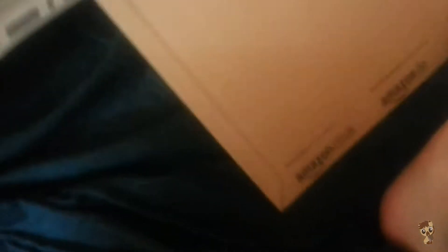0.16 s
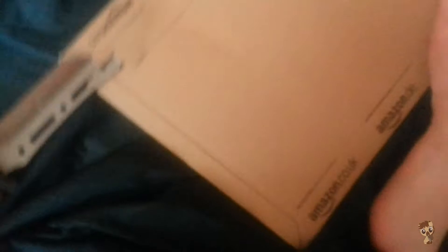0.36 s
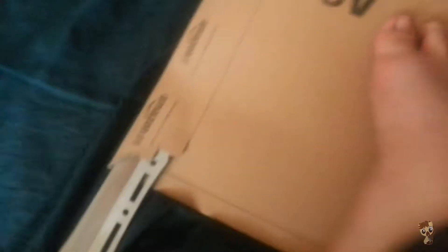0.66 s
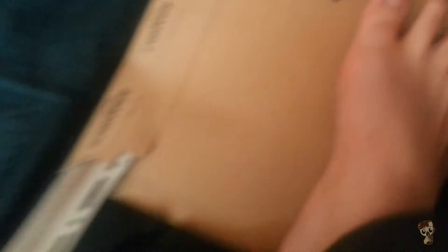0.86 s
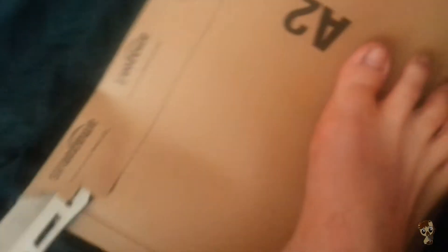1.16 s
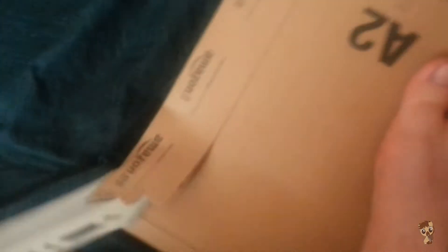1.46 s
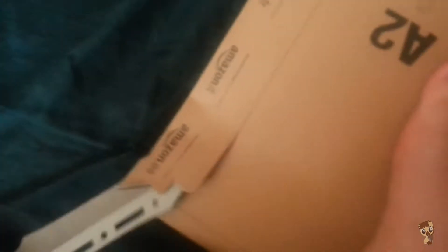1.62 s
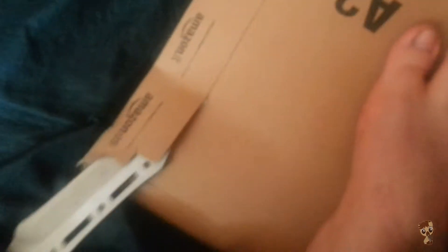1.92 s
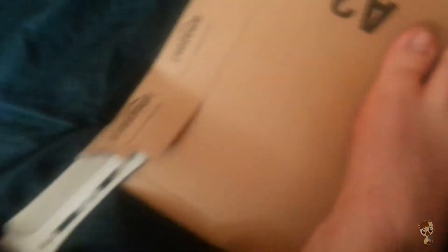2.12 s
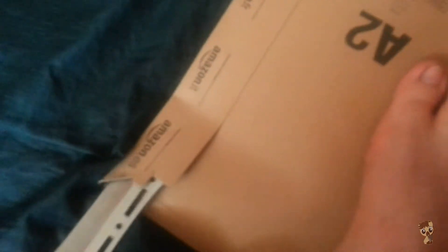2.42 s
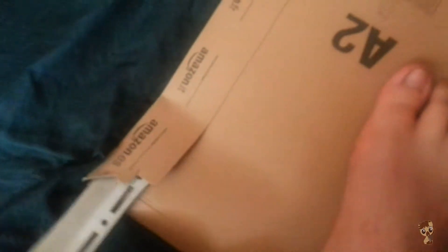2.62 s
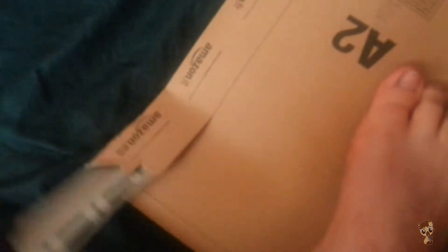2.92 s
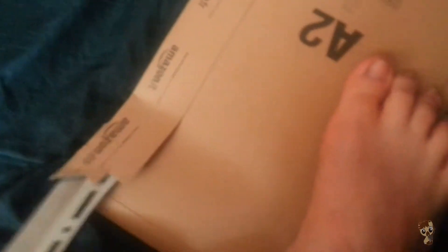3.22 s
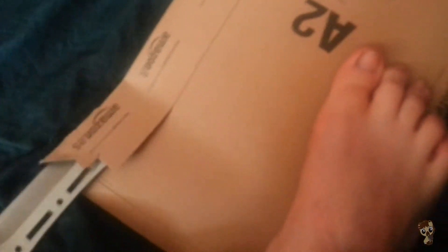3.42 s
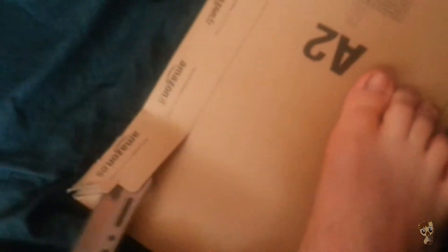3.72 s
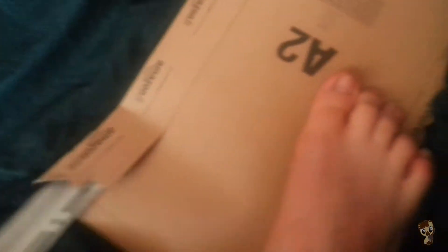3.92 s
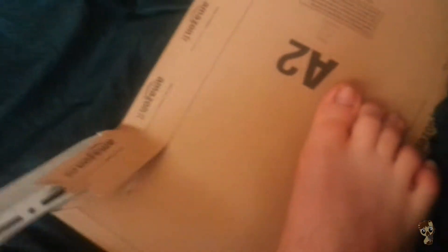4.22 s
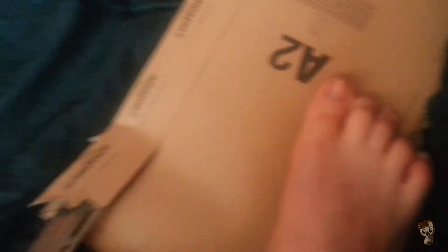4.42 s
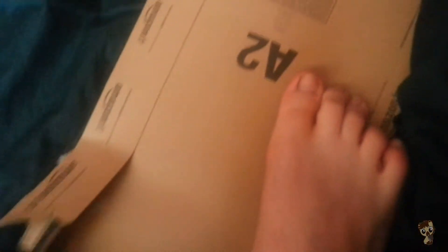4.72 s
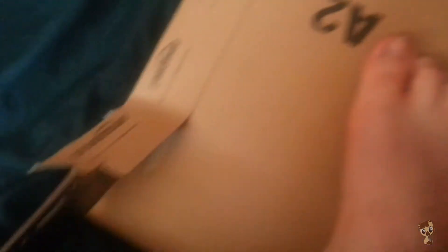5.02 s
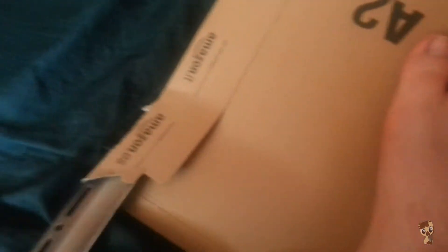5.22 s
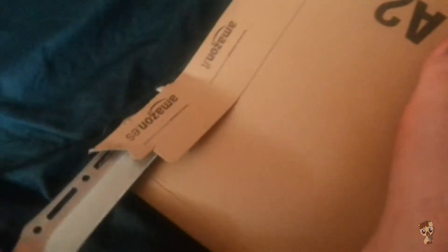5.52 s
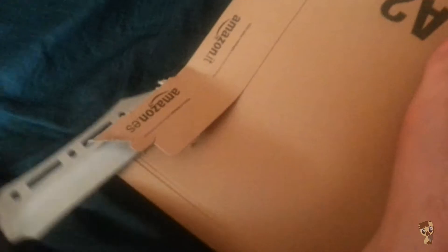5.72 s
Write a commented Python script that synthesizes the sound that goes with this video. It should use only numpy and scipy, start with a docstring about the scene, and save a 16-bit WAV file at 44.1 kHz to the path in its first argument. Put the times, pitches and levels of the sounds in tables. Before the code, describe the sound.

Close, dry cardboard rasping and tearing in short jerky bursts, with small crisp snaps, dull panel pops and faint hiss.

```python
"""Bedroom: a steel blade saws back and forth under the glued flap of a cardboard mailer lying on a bed, close by.
Random fibre breaks, shaped by the strokes and two flap modes, make the rasp; short pitched bursts make the snaps.
The flat panel drums as low filtered breaks; its pops, and handling knocks, are decaying modes that sag in pitch.
Two microphone ports ring at different pitches; shaped noise gives a faint hiss and a thin high whine."""
import sys
import numpy as np
from scipy import signal
from scipy.fft import rfft, irfft, next_fast_len
from scipy.io import wavfile
from scipy.ndimage import uniform_filter1d, map_coordinates

SR = 44100
rng = np.random.default_rng(int(sys.argv[2]) if len(sys.argv) > 2 else 0)


def magnitude_from_level(level_db):
    """Linear magnitude for a level in decibels (20 dB per decade)."""
    exponent = np.asarray(level_db, float) / 20
    return 10 ** exponent


def wav_record(signal):
    """Record a signal, one row per channel, as 16-bit PCM in the file named by sys.argv[1]."""
    frames = np.transpose(np.atleast_2d(signal))
    bounded = np.clip(frames, -1, 1)
    # unit amplitude maps onto the largest positive 16-bit level
    quanta = np.round(bounded * 32767).astype(np.int16)
    wavfile.write(sys.argv[1], SR, quanta)


N = 258426

# how the flap is held: time_s, brightness_db_per_octave, left_turn_db, drum_over_rasp_db
FLAP_GRIP = [(0, 0, -3, -12), (0.45, -2.5, -3, -15), (0.8, 0, -3.5, -10.5), (1.1, -2, -0.5, -11),
             (1.45, -0.5, -1.5, -8), (1.75, 0, -5, -12), (2.1, -1.5, -1, -13), (2.45, -2, -3.5, -11),
             (2.8, -2.5, -0.5, -10.5), (3.05, -1, -3.5, -12.5), (3.4, -3.5, -1.5, -14),
             (3.75, -3.5, -1, -12.5), (4.1, -1.5, -3.5, -12.5), (4.4, 1.5, -2, -14), (4.7, -5.5, -1.5, -17),
             (4.9, 2.5, -1.5, -4), (5.1, -2.5, 3, -14.5), (5.4, -1.5, 0, -12), (5.86, 0.5, 0.5, -14)]


def unit(x):
    """Scaled to rms 1."""
    return x / np.sqrt(np.mean(x ** 2) + 1e-20)


def along(points, hz):
    """(Hz, value) points read on a log frequency axis."""
    f, v = np.transpose(points)
    return np.interp(np.log(hz + 1), np.log(f + 1), v)


def over_time(rows, column, t):
    """One column of a table of curves at times t."""
    rows = np.transpose(rows)
    return np.interp(t, rows[0], rows[column])


def coloured(x, spectrum):
    """x through the causal minimum-phase filter of this (Hz, dB) shape, built by folding the cepstrum."""
    m = 2 * next_fast_len(N // 2 + 4096)
    gain = magnitude_from_level(along(spectrum, np.fft.rfftfreq(m, 1 / SR)))
    cepstrum = irfft(np.log(gain + 1e-6), m)
    cepstrum[1:m // 2] *= 2
    cepstrum[m // 2 + 1:] = 0
    return irfft(rfft(x, m) * np.exp(rfft(cepstrum)), m)[..., :N]


def wobble(rate_hz):
    """A smooth random curve, rate_hz knots a second."""
    knots = rng.standard_normal(N // 50)
    return map_coordinates(knots, [np.arange(N) * rate_hz / SR])


def strokes(t):
    """Level (dB) and mode balance (dB) at times t: stroke powers add and weight the balance."""
    # blade strokes: hardest_push_s, level_db, rise_s, fall_s, high_over_low_mode_db; rise and fall span 20 dB
    stroke_rows = [(0.019, -25, 0.33, 0.12, 1), (0.108, -27, 0.1, 0.056, 3.5),
                   (0.185, -28.5, 0.029, 0.032, -7), (0.368, -32.5, 0.16, 0.32, 1.5),
                   (0.594, -30, 0.28, 0.13, 0), (0.734, -37.5, 0.11, 0.14, -4),
                   (0.915, -34, 0.074, 0.58, 2.5), (1.122, -31.5, 0.16, 0.06, -1),
                   (1.271, -35.5, 0.051, 0.15, -3), (1.473, -19.5, 0.038, 0.071, -9),
                   (1.534, -21.5, 0.052, 0.042, 3), (1.628, -26.5, 0.08, 0.034, -4),
                   (1.683, -28, 0.049, 0.093, -4), (1.755, -27.5, 0.12, 0.064, -4),
                   (1.877, -30.5, 0.033, 0.018, -8), (1.933, -33.5, 0.07, 0.065, -3.5),
                   (2.038, -18.5, 0.037, 0.037, 1), (2.085, -27.5, 0.057, 0.035, 0),
                   (2.171, -19, 0.042, 0.075, -1.0), (2.336, -26, 0.081, 0.05, -1),
                   (2.437, -22, 0.051, 0.077, -3), (2.608, -29.5, 0.061, 0.034, -7.5),
                   (2.719, -33, 0.076, 0.18, -15), (2.806, -20.5, 0.17, 0.14, -11),
                   (2.954, -33, 0.041, 0.062, -3), (3.041, -28, 0.046, 0.086, 1),
                   (3.157, -44, 0.053, 0.43, -7), (3.272, -20, 0.04, 0.017, -8),
                   (3.326, -26.5, 0.081, 0.054, -2.5), (3.416, -23.5, 0.036, 0.1, -8),
                   (3.458, -23.5, 0.076, 0.024, -4), (3.5, -39.5, 0.06, 0.085, -1),
                   (3.687, -39, 0.033, 0.042, -1.0), (3.758, -27.5, 0.064, 0.073, -10),
                   (3.856, -39, 0.068, 0.12, -11), (3.998, -35.5, 0.19, 0.12, 0),
                   (4.081, -22.5, 0.064, 0.088, -10.5), (4.128, -23.5, 0.093, 0.062, -6.5),
                   (4.214, -38, 0.11, 0.08, -4), (4.366, -36.5, 0.084, 0.11, -1),
                   (4.425, -33.5, 0.12, 0.05, -11), (4.541, -38.5, 0.086, 0.083, -6),
                   (4.721, -25, 0.024, 0.14, -8.5), (4.789, -25, 0.099, 0.051, -11),
                   (4.897, -43, 0.068, 0.11, -4), (4.979, -28, 0.015, 0.081, 2),
                   (5.037, -17.5, 0.056, 0.071, 7.5), (5.131, -19, 0.061, 0.069, 0),
                   (5.283, -35.5, 0.43, 0.12, 1.5), (5.352, -25, 0.014, 0.1, 3),
                   (5.416, -24, 0.055, 0.019, 9), (5.445, -36, 0.04, 0.055, 1), (5.69, -34, 0.027, 0.11, 1),
                   (5.775, -32, 0.12, 0.061, 7.5), (5.861, -34, 0.049, 0.07, -4)]
    roundness = 1.53  # 1 = pointed stroke, 2 = bell
    rest_db = -60  # blade lying still
    peak_s, level_db, rise_s, fall_s, mode_db = np.transpose(stroke_rows)[:, :, None]
    span_s = np.maximum(np.where(t < peak_s, rise_s, fall_s), .008)
    late = (t - peak_s) / span_s
    power = magnitude_from_level(level_db - 20 * np.abs(late) ** roundness) ** 2
    total = power.sum(0) + magnitude_from_level(rest_db) ** 2
    return 10 * np.log10(total), (power * mode_db).sum(0) / total


def stroke():
    """Push of the blade in dB, read every 2 ms and interpolated to one value per sample."""
    t = np.arange(0, N / SR + .002, .002)
    return np.interp(np.arange(N) / SR, t, strokes(t)[0])


def fibres(share, spread_db, clump_db, clump_rate_hz):
    """Tiny breaks: a share of all samples fires, a few much harder, in clumps."""
    fire, size, sign = rng.random(N), rng.exponential(size=N), rng.standard_normal(N)
    strength = magnitude_from_level(spread_db * size + clump_db * wobble(clump_rate_hz))
    return unit((fire < share) * sign * strength)


def contact(x, width_oct, patchy_db):
    """The flap rings in a low and a high mode; each stroke has its balance, the grip sets brightness and side."""
    # how sharply both modes ring out of the rasp: time_s, ringing_db
    mode_ringing = [(0, -1.5), (1.1, 1.5), (1.5, 1.5), (2.04, 2), (2.8, 0), (3.3, 0.5), (4.1, -0.5),
                    (4.75, 0), (5.08, 5.5), (5.4, 2), (5.86, 3)]
    dulls = 0.1  # dB per octave of brightness lost per dB of push
    # the steel blade rings near 12 kHz once
    blade_s, blade_half_s, blade_db, blade_hz = 5.09, 0.067, 10.5, 12400
    hz, t, z = signal.stft(x, SR, nperseg=256)
    hz = hz[:, None]
    octave = np.log2((hz + 50) / 4000)
    high = np.exp(-((octave - .33) / width_oct * 1.5) ** 2)
    low = np.exp(-((octave + .35) / width_oct) ** 2)
    narrow = np.exp(-((octave - .36) / 0.075) ** 2) + np.exp(-((octave + 0.58) / 0.39) ** 2)
    narrow -= np.exp(-(octave / 0.062) ** 2)  # dip between the modes

    # random patches of time and frequency make the rasp uneven, more so in hard strokes
    field = rng.standard_normal(z.shape[1:])
    field = uniform_filter1d(uniform_filter1d(field, size=3, axis=0), size=10, axis=1)
    level_db, mode_db = strokes(t)
    patches = patchy_db * np.clip(1.5 + (level_db + 24) / 25, .3, 1.3) * unit(field)

    bright = over_time(FLAP_GRIP, 1, t) - dulls * (level_db + 27.0)
    tilt = bright * np.maximum(octave - .4, 0)
    blade_ring = blade_db * np.exp(-((t - blade_s) / blade_half_s) ** 4 - ((hz - blade_hz) / 1500) ** 2)
    ringing = over_time(mode_ringing, 1, t) * narrow
    gain = magnitude_from_level(mode_db / 2 * (high - low) + ringing + tilt + blade_ring + patches)
    gain /= np.sqrt(np.mean(gain[14:36] ** 2, axis=0))  # rms gain 1 over 2.4-6 kHz
    right = magnitude_from_level(-over_time(FLAP_GRIP, 2, t))
    sides = np.array([np.ones_like(right), right])[:, None]
    return signal.istft(z * gain * sides, SR, nperseg=256)[1][..., :N]


def rasp():
    """One stream of breaks reaches both ports, each port hears some of its own; hard strokes tear in jerks."""
    both, left, right = [fibres(.5, spread_db=1.5, clump_db=1.5, clump_rate_hz=440) for _ in range(3)]
    own = .7  # power share heard by one port alone
    pair = np.sqrt(1 - own) * both + np.sqrt(own) * np.array([left, right])
    level = magnitude_from_level(stroke())
    depth_db = 2.4 * np.clip(level / .08, .15, 1)
    jerks = magnitude_from_level(depth_db * (wobble(260) + .6 * wobble(60)))
    return magnitude_from_level(11.5) * level * jerks * contact(pair, width_oct=0.74, patchy_db=1.5)


def slips():
    """The blade snaps free: each snap is a millisecond burst of noise and tone that rings at its own pitch."""
    # snaps of single fibres and glue spots: start_s, relative_level_db, pitch_hz
    snap_rows = [(1.4541, -23, 3900), (1.463, -8.5, 4900), (1.475, -8, 3600), (1.488, -13.5, 4450),
                 (1.516, -6, 5200), (1.531, -20, 3960), (1.542, -7.5, 4160), (1.6827, -4.5, 7400),
                 (1.8295, -18, 4700), (1.877, -31, 3880), (2.0223, -16, 4660), (2.0401, -3, 4920),
                 (2.611, -19, 4070), (2.7494, -14, 2850), (2.867, -7, 2600), (2.942, -14.5, 3380),
                 (3.025, -19, 4820), (3.0517, -12, 5000), (3.262, -8.5, 4760), (3.276, -2.5, 4880),
                 (3.3915, -16.5, 3950), (3.686, -21, 4630), (3.896, -23, 4250), (3.995, -10.5, 6800),
                 (4.0738, -5.5, 3380), (4.132, -10, 3680), (4.356, -16, 3240), (4.403, -15.5, 3530),
                 (4.801, -9.5, 2720), (4.9307, -27, 4280), (5.029, -6.5, 5130), (5.045, -8, 5200),
                 (5.093, -8.5, 3140), (5.125, -4, 3200), (5.141, -5, 4700), (5.155, -10.5, 3800),
                 (5.171, -10.5, 4730), (5.267, -26, 4540), (5.3248, -21, 4240), (5.3475, -12, 5000),
                 (5.5954, -25.5, 2360), (5.687, -20.5, 4100)]
    out, t = np.zeros((2, N + 2048)), np.arange(2048) / SR
    hz = np.fft.rfftfreq(len(t), 1 / SR)
    shape = (1 - np.exp(-t / 0.00015)) * np.exp(-(t / 0.0022) ** 2)
    width_hz = 800
    for start_s, level_db, pitch_hz in snap_rows:
        noise = rng.standard_normal((3, len(t)))
        tone = 0.68 * np.sin(2 * np.pi * pitch_hz * t)
        burst = shape * (noise[0] + noise[1:] + tone)  # shared noise plus one per port
        burst /= np.linalg.norm(burst)
        ring = 0.58 + 1.6j * hz * width_hz / (pitch_hz ** 2 - hz ** 2 + 1j * hz * width_hz)
        out[:, round(start_s * SR):][:, :len(t)] += magnitude_from_level(20 + level_db) * irfft(rfft(burst) * ring)
    return out[:, :N]


def drumming():
    """The sheet drums under the stroke: low filtered breaks that lag behind the push in level."""
    # drum spectrum: freq_hz, relative_level_db
    drum_spectrum = [(25, -39), (70, -14), (110, -4), (170, 0), (210, -0.5), (238, 5), (285, -2.5),
                     (450, -4.5), (900, -8), (1800, -10.5), (2600, -8), (4400, -58)]
    drum_lag = 0.16  # dB of drumming left behind per dB of push
    both, left, right = [fibres(.3, spread_db=2, clump_db=1.5, clump_rate_hz=60) for _ in range(3)]
    apart = coloured(np.array([left, right]), [(40, 20.5), (200, -12.5), (600, 0.5), (1500, 2.5)])
    side_db = np.array([[4.2], [1.8]])
    t = np.arange(N) / SR
    drum_db = over_time(FLAP_GRIP, 3, t) - drum_lag * (stroke() + 30) + side_db
    return magnitude_from_level(stroke() + drum_db) * unit(coloured(both + apart, drum_spectrum))


def smooth_noise(count, size):
    """Noise dulled by two running means of size samples."""
    return uniform_filter1d(uniform_filter1d(rng.standard_normal(count), size=size), size=size)


def thumps():
    """Panel pops as it bends, plus handling knocks near the left port where the level leans far left."""
    # thumps: start_s, relative_level_db, pitch_hz, left_minus_right_db
    thump_rows = [(0.115, -22, 171, 1), (0.184, -35, 434, 5), (0.685, -41, 303, 0.5), (0.694, -38, 589, 2),
                  (0.746, -40.5, 380, 1.0), (0.771, -43, 252, 0), (0.795, -42.5, 250, 12),
                  (0.827, -42.5, 423, 4), (0.899, -28, 320, 22), (0.908, -22.5, 203, 35),
                  (0.923, -39, 375, 18), (1.275, -38, 376, 16), (1.473, -20.5, 356, -1),
                  (1.489, -16, 158, -1), (1.523, -20, 160, -1), (1.691, -31.5, 227, -4),
                  (2.047, -26.5, 157, 0), (2.165, -25, 247, 0), (2.182, -25, 247, -2), (2.446, -22, 172, 0),
                  (2.703, -26, 245, -2), (2.768, -27, 260, -3), (2.94, -30.5, 234, -1),
                  (3.024, -32.5, 211, -2), (3.275, -16, 208, 0.5), (3.461, -19.5, 187, -1.5),
                  (3.933, -29.5, 166, -1), (4.085, -28.5, 393, 2), (4.653, -39, 218, 29),
                  (4.81, -33, 215, 5), (4.823, -34, 205, 5), (4.905, -37, 293, 23), (4.929, -35.5, 352, 18),
                  (4.977, -29, 239, 4), (5.189, -32.5, 158, 0), (5.289, -29.5, 168, -1),
                  (5.347, -29, 374, -1), (5.683, -27, 194, 2)]
    # modes: pitch_multiple, relative_level_db, t60_s
    mode_rows = [(1.001, 1, 0.044), (1.7, -6, 0.036), (2.9, -5.5, 0.015)]
    out, t = np.zeros((2, N + SR // 4)), np.arange(SR // 4) / SR
    sag = t - 0.068 * (t - 0.013 * (1 - np.exp(-t / 0.007)))  # pitch drops as the sheet slackens
    for start_s, level_db, pitch_hz, pan_db in thump_rows:
        ring = np.zeros(len(t))
        for multiple, mode_db, t60_s in mode_rows:
            decay = magnitude_from_level(mode_db + rng.normal(0, 0.15) - 60 * t / t60_s)
            ring += decay * np.sin(2 * np.pi * multiple * pitch_hz * sag)
        papery = smooth_noise(len(t), 24)  # dull puff up to 1 kHz
        papery -= uniform_filter1d(papery, size=150)  # the microphones roll off the deep bass
        ring += 2.2 * magnitude_from_level(-60 * t / .03) * papery
        ring *= 1 - np.exp(-t / 0.0032)
        touch = smooth_noise(len(t), 11)  # first contact, up to 2 kHz
        touch -= uniform_filter1d(touch, size=60)
        ring += 1.27 * magnitude_from_level(-60 * t / 0.0097) * (1 - np.exp(-t / 0.00033)) * touch
        sides = magnitude_from_level([pan_db / 2, -pan_db / 2])
        sides = (sides / sides.mean())[:, None]
        out[:, round(start_s * SR):][:, :len(t)] += magnitude_from_level(level_db + 7.5) * sides * ring
    return signal.sosfilt(signal.butter(2, 80, 'high', fs=SR, output='sos'), out[:, :N])


def ports(x):
    """Each port has its own cavity resonance; the left one is farther from the flap, one sample later."""
    # port responses: freq_hz, gain_db
    left_response = [(700, -25), (1700, -12), (2500, -5), (3200, 0), (4150, 2.5), (5050, 2.5), (5700, -1),
                     (6500, -4), (9000, -8.5), (12000, -16), (15500, -25), (16000, -74)]
    right_response = [(700, -40), (1700, -32), (3500, -15.5), (5000, -12.5), (6200, -9.5), (7200, -1.5),
                      (8300, -9.5), (10500, -15), (15500, -26), (16000, -19)]
    left = coloured(np.roll(x[0], 1), left_response)
    return np.array([left, coloured(x[1], right_response)])


def bedroom(x):
    """A short soft tail of decaying noise, 200 samples late; each frequency dies at its own speed."""
    # room decay: freq_hz, t60_s
    room_decay = [(150, 0.3), (2000, 0.058), (10000, 0.026)]
    hz, t, z = signal.stft(rng.standard_normal((2, SR // 3)), SR, nperseg=256)
    decay = magnitude_from_level(-60 * t / along(room_decay, hz)[:, None])
    tail = signal.istft(z * decay, SR, nperseg=256)[1]
    tail /= np.linalg.norm(tail[0])
    return signal.fftconvolve(np.pad(x, ((0, 0), (200, 0))), tail, axes=1)[:, :N]


def background():
    """Steady shaped-noise hiss and a whine of narrow noise near 9.5 kHz with an unsteady level."""
    # hiss spectrum: freq_hz, relative_density_db
    hiss_spectrum = [(18, -34), (30, 22), (228, 18.5), (1830, 3), (4200, -5), (8690, 15), (9640, 7),
                     (12200, 7), (13900, -36.5), (15000, -41)]
    hiss = magnitude_from_level(-59) * unit(coloured(rng.standard_normal((2, N)), hiss_spectrum))
    band = [(8900, -34.5), (9480, -12), (10000, -34.0)]
    whine_db = -54.0 + 0.39 * wobble(24)
    return hiss + magnitude_from_level(whine_db) * unit(coloured(rng.standard_normal((2, N)), band))


def scene():
    """Blade sounds and their tail pass the ports; panel, knocks, their tail and background join them."""
    blade = rasp() + slips()
    sheet = drumming() + thumps()
    blade = blade + magnitude_from_level(-19) * bedroom(blade)
    return ports(blade) + sheet + magnitude_from_level(-18.0) * bedroom(sheet) + background()


def low_pass(x):
    """Removes everything above the highest recorded frequency."""
    return signal.sosfilt(signal.butter(12, 16000, fs=SR, output="sos"), x)


def record(dry):
    """Peaks beyond full scale clip."""
    mix = np.clip(dry, -1, 1)
    return low_pass(mix)


dry = scene()
out = record(dry)
wav_record(out)
```